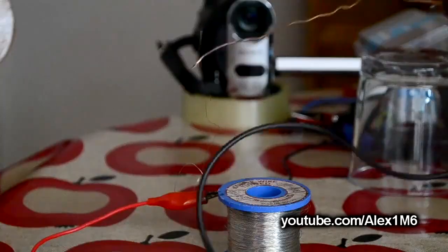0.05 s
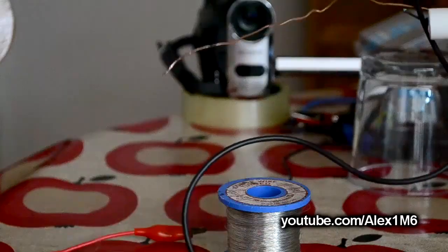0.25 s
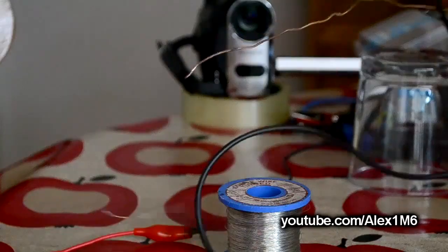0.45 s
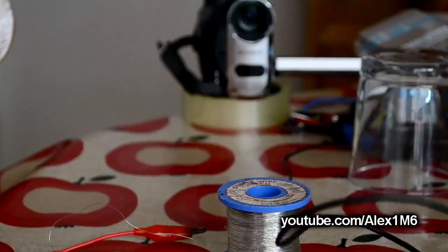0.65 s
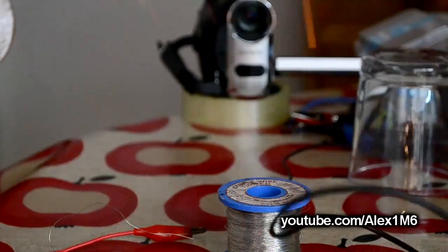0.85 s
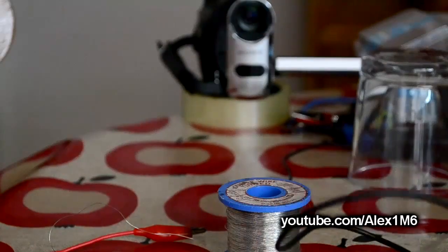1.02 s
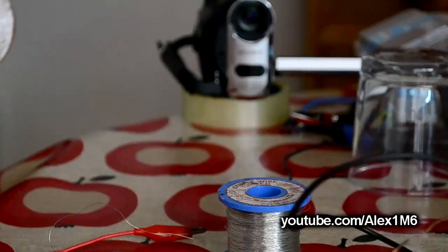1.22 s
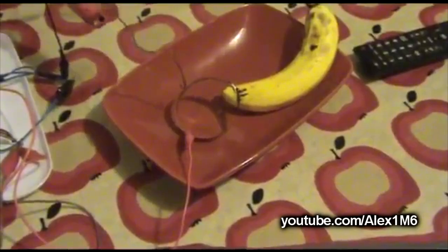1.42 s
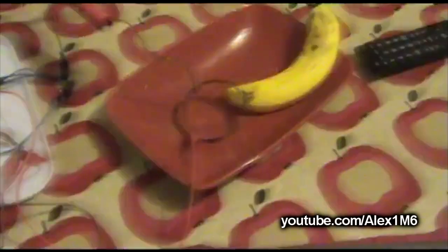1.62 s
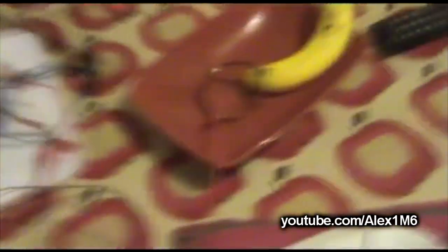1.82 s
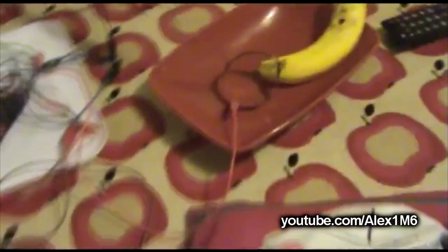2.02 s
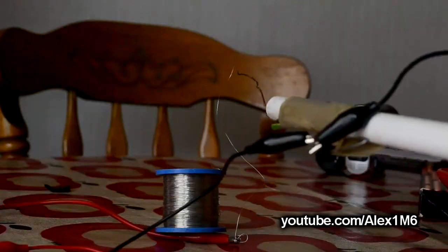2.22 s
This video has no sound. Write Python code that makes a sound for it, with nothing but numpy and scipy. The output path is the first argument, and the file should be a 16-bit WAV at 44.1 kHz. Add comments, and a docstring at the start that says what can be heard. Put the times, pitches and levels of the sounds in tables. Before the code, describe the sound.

Three loud, sharp electrical bangs crack at about 0.2, 0.9 and 1.7 seconds as thin wires burst on a table. Each overloads the microphone, then dies away within half a second with small-room echo and a slight ring of glass and metal. The third is heavier and wider, with a deep table thud, followed by faint microphone handling rumble around 2 seconds. Quiet hiss lies between the bangs.

```python
"""In a small room, a capacitor bank is shorted through thin wire on a table three times.
Each wire bursts with a push of air and a sharp crack. The table thuds, glass and metal on it ring,
and the room rings on. The bangs overload a camera's sound, then its gain control holds the ringing
down until it sinks towards the hiss. Two bangs are in mono; the third is in stereo, with the rumble
of a jolted camera. Hard cuts join the three bangs and a last moment of hiss."""
import sys
import numpy as np
from scipy import signal
from scipy.fft import irfft, next_fast_len
from scipy.io import wavfile

SR = 44100
rng = np.random.default_rng(int(sys.argv[2]) if len(sys.argv) > 2 else 0)


def inscribe(sig):
    """Save sig as 16-bit PCM at rate SR to the path in sys.argv[1].

    A 1-D sig is mono; a 2-D sig holds one channel per row.
    Samples are clipped to [-1, 1] before scaling.
    """
    pcm = np.round(np.clip(np.atleast_2d(sig).T, -1, 1) * 32767)
    wavfile.write(sys.argv[1], SR, pcm.astype(np.int16))


N = 103635

# A fade time (T60) is the time a sound takes to drop by 60 dB.
# The times, in seconds, of the cuts between the four parts.
CUT_TIMES = [.703, 1.403, 2.27]
# The tone of each camera's hiss. Each row: frequency in Hz, relative level in dB.
MONO_HISS_TONE = [(30, -18), (90, -9), (160, -2), (250, 0), (330, -3), (480, 0), (900, -2), (1500, -7),
                  (2800, -12), (3080, -8), (3300, -14), (4500, -17), (6700, -17), (7500, -23), (10000, -27)]
STEREO_HISS_TONE = [(30, -6), (160, -1), (260, 0), (350, -5), (398, 5), (450, -8), (580, -1), (680, -9),
                    (780, -1), (950, -9), (1400, -3), (1900, -14), (2800, -21), (5000, -22), (6500, -18),
                    (8000, -23), (10000, -21)]
# The rumble of the jolted camera. Each row: time in seconds, level in dB.
JOLT_LEVELS = [(1.7, -80), (1.85, -47), (1.96, -37), (2.05, -38), (2.12, -49), (2.19, -43), (2.26, -43)]
# The tone of that rumble. Each row: frequency in Hz, relative level in dB.
JOLT_TONE = [(30, -6), (80, -7), (115, -5), (140, 7), (175, -4), (230, -5), (320, 0), (430, -8), (600, -6),
             (1000, -13), (2000, -18), (5000, -22), (10000, -35)]
# How the room dies away around each camera. Each row: frequency in Hz, base fade time in seconds.
MONO_ROOM_FADES = [(60, .28), (200, .4), (500, .44), (1000, .48), (2200, .55), (3300, .51), (5000, .51),
                   (10000, .45)]
STEREO_ROOM_FADES = [(60, .38), (150, .53), (500, .51), (1000, .47), (2300, .465), (5000, .47),
                     (10000, .41)]
# The tone of the room's ring and of the crack, one list per bang.
# Each row: frequency in Hz, relative level in dB.
RING_TONES = [
    [(24, -67), (40, -37), (117, -22), (144, -19.5), (224, -23), (252, -14), (311, -14), (349, -6),
     (496, -6), (544, -1), (584, -6), (720, -6), (772, -4), (1170, -4.5), (1290, -3.5), (1750, -6.5),
     (1920, -3), (2310, -4.5), (2980, -4), (5100, -5.5), (6000, -4), (7940, -8), (8710, -3), (9570, -2),
     (10500, -11), (13600, -41), (22000, -120)],
    [(24, -55.5), (40, -38), (80, -29.5), (151, -22.5), (241, -22), (277, -17), (341, -17), (421, -8),
     (462, -14), (597, -10), (656, -12), (888, -6), (952, -6), (1170, -3), (1450, -6.5), (1550, -5),
     (2850, 0), (3270, -4), (3770, -8), (4040, -4), (6140, -5), (6900, -6), (7940, -12), (9570, -9),
     (10500, -18), (13600, -48), (22000, -120)],
    [(24, -61), (40, -31), (103, -34.5), (160, -19), (188, -13), (237, -18), (279, -11), (320, -17.5),
     (532, -9), (583, -12), (625, -9), (735, -9), (844, -5.5), (1060, -3), (1140, -1), (1250, 0),
     (1370, -1.5), (1470, -2), (1730, -3.5), (2390, -2), (3150, -6.5), (3620, -2), (5740, -4), (8310, -9),
     (10000, -14), (13000, -44), (22000, -120)],
]
CRACK_TONES = [
    [(40, -18), (170, -12), (260, -10), (400, -12), (550, 3), (700, -1), (1100, -4), (1550, 0), (1900, -8),
     (3300, -7), (5000, -14.5), (7900, -20), (10000, -14)],
    [(40, -19), (170, -9), (340, -6), (480, 0), (650, -1), (870, -2), (1400, 1), (2300, 1), (3000, -6),
     (5700, -10), (7500, -17), (10000, -14)],
    [(40, -3), (100, 4), (220, -1), (430, -4), (630, 5), (850, -6), (1020, 1), (1300, 2), (2200, -4),
     (4400, -5), (5700, -2), (10000, -1)],
]
# The notes of the glass and metal, one list per bang.
# Each row: pitch in Hz, relative level in dB, fade time in seconds (capped at OBJECT_MAX_T60_S).
OBJECT_NOTES = [
    [(1249, -13, 0.51), (1922, -12, 0.53), (3090, -10, 0.48), (4479, -12, 0.49), (4737, -15, 0.58),
     (5879, -14, 0.51), (6352, -16, 0.56), (7381, -14, 0.43), (8640, -7, 0.29), (8710, -11, 0.39),
     (8899, -12, 0.41), (9222, -17, 0.62), (9528, 0, 0.19), (9830, -15, 0.46)],
    [(1879, -3, 0.51), (2439, -8, 0.75), (2950, 0, 0.39), (3020, -10, 0.65), (4059, -13, 0.89),
     (4850, -12, 0.66), (5093, -9, 0.62), (5410, -8, 0.51), (5905, -2, 0.28), (6740, -8, 0.48),
     (8651, -12, 0.52), (9281, -2, 0.25), (9421, -11, 0.45), (9641, -13, 0.53)],
    [(1400, -6, 1.2), (2008, -8, 1.1), (2428, -1, 0.62), (3478, -21, 5.0), (3650, -5, 0.79),
     (3892, 0, 0.41), (4215, -11, 2.7), (5259, -14, 2.3), (5927, -9, 1.1), (6546, -18, 4.0),
     (6740, -11, 1.1), (7795, -10, 0.77)],
]
OBJECT_LEVELS_DB, OBJECT_MAX_T60_S = [-3, -3.5, 7.5], .43
# The table's thud at each bang. Each row: level in dB, pitch in Hz, spread in Hz, fade time in seconds.
TABLE_THUDS = [(-35, 130, 70, .22), (-12, 400, 260, .24), (18, 100, 34, .135)]
# Nearby surfaces throw the blast back. Each row: delay in seconds, relative level in dB.
NEAR_ECHOES = [(.0034, -10), (.0165, -8)]
# The bursting wires. Each row: start in seconds, blast level in dB, length of the push in seconds,
# crack level in dB, room level in dB, a number that multiplies the room's fade times.
WIRE_BURSTS = [(.2019, 9.5, .0006, 12.5, 11.2, .92), (.9356, 10, .0006, 15, 17.2, .88),
               (1.6661, 30, .002, 22, 25.2, 1.0)]
# How alike left and right are in stereo.
# Each row: frequency in Hz, likeness (1 is the same, 0 is unrelated, below 0 is partly opposite).
HISS_AND_JOLT_LIKENESS = [(60, .6), (200, .1), (1000, .1), (9000, 0.27)]
ROOM_LIKENESS = [(60, .8), (150, .2), (300, .4), (1000, .55), (3000, 0.45), (9000, .6)]
TABLE_LIKENESS = [(60, .8), (140, 0)]
WIRE_CRACK_LIKENESS = [(60, .7), (140, -.2), (400, .1), (1500, .3), (9000, 0.17)]
# The gain control for each bang. Each row: limit in dB, softness of the bend in dB,
# level in dB where gentle turning down begins, share of the excess it removes (0 to 1).
GAIN_SETTINGS = [(-6.5, 2, -20, .31), (-6.8, 2, -21, .43), (-9.6, 1.5, -20, .05)]


def amp(db):
    """Turns decibels into a number to multiply by."""
    return 10 ** (np.asarray(db) / 20)


def fade(t, t60):
    """A smooth fade that drops 60 dB in t60 seconds."""
    return np.exp(-np.log(1000) * t / t60)


def look_up(points, hz):
    """Finds values between a table's rows, giving each octave about equal space."""
    row_hz, values = np.transpose(points)
    return np.interp(np.log(hz + 1), np.log(row_hz + 1), values)


def noise(tone, likeness=None):
    """Left and right noise with a given tone; both sides match unless a likeness is given."""
    size = next_fast_len(N)
    hz = np.fft.rfftfreq(size, 1 / SR)
    a, b, c, d = rng.standard_normal((4, len(hz)))
    same = 1 if likeness is None else np.clip(look_up(likeness, hz), -1, 1)
    left = a + 1j * b
    right = same * left + np.sqrt(1 - same ** 2) * (c + 1j * d)
    spectrum = np.array([left, right]) * amp(look_up(tone, hz)) * (hz < 12000)
    sound = irfft(spectrum, size)[:, :N]
    return sound / sound.std()


def parts():
    """The samples that each of the four parts fills."""
    edges = [0] + [round(seconds * SR) for seconds in CUT_TIMES] + [N]
    return [slice(start, end) for start, end in zip(edges, edges[1:])]


def smooth(x, seconds):
    """Follows a signal with a lag, evening out quick changes."""
    keep = np.exp(-1 / (seconds * SR))
    return signal.lfilter([1 - keep], [1, -keep], x)


def low_pass(x, hz, taps):
    """Removes the treble above hz; more taps make the edge steeper."""
    weights = signal.firwin(taps, hz, window=("kaiser", 9), fs=SR)
    return signal.oaconvolve(x, weights[None], "same", axes=1)


def hiss(tone, level_db, likeness=None):
    """The steady hiss behind everything."""
    return amp(level_db) * noise(tone, likeness)


def camera_jolt(t):
    """The hand-held camera rumbles as it jolts after the third bang."""
    level_db = np.interp(t, *np.transpose(JOLT_LEVELS))
    return amp(level_db) * noise(JOLT_TONE, HISS_AND_JOLT_LIKENESS)


def room_ring(t, tone, room_fades, stretch, likeness, rise_s=.006):
    """Echoes quickly fill the room, then each frequency dies away at its own speed."""
    hz, times, spectrum = signal.stft(noise(tone, likeness), SR, nperseg=512, noverlap=384)
    t60 = stretch * look_up(room_fades, hz)[:, None]
    _, ring = signal.istft(spectrum * fade(times, t60), SR, nperseg=512, noverlap=384)
    return ring[:, :N] * (1 - np.exp(-t / rise_s))


def glass_and_metal(t, notes):
    """Things on the table, struck by the blast, ring with pure fading notes."""
    ringing = np.zeros(N)
    for hz, db, t60 in notes:
        wave = np.sin(2 * np.pi * (hz * t + rng.random()))
        ringing += amp(db) * fade(t, min(t60, OBJECT_MAX_T60_S)) * wave
    return ringing


def table_thud(t, level_db, pitch_hz, spread_hz, t60, likeness):
    """The table top shakes briefly in a broad band around one low pitch."""
    hz = np.geomspace(20, 2000, 60)
    tone_db = -20 * np.log10(1 + ((hz - pitch_hz) / spread_hz) ** 2)
    return amp(level_db) * noise(np.transpose([hz, tone_db]), likeness) * fade(t, t60)


def wire_crack(t, tone, likeness):
    """Reflections from close by blur into one short crack of noise."""
    return noise(tone, likeness) * fade(t, t60=.135)


def blast_wave(t, push_s):
    """The bursting wire gives the air a sudden push, followed by a longer, weaker pull."""
    age = np.maximum(t, 0) / push_s
    return (t >= 0) * (1 - age) * np.exp(-age)


def wire_bang(t, index, room_fades, crack_likeness=None, ring_likeness=None, thud_likeness=None):
    """One wire bursts: a blast with echoes and a crack, then the table and room ring on."""
    start_s, blast_db, push_s, crack_db, room_db, stretch = WIRE_BURSTS[index]
    echoes = sum(amp(db) * blast_wave(t - delay, push_s) for delay, db in NEAR_ECHOES)
    blast = amp(blast_db) * (blast_wave(t, push_s) + echoes)
    crack = amp(crack_db) * wire_crack(t, CRACK_TONES[index], crack_likeness)
    ring = amp(room_db) * room_ring(t, RING_TONES[index], room_fades, stretch, ring_likeness)
    thud = table_thud(t, *TABLE_THUDS[index], thud_likeness)
    objects = amp(OBJECT_LEVELS_DB[index]) * glass_and_metal(t, OBJECT_NOTES[index])
    sound = crack + ring + thud + objects - blast
    return np.pad(sound, ((0, 0), (round(start_s * SR), 0)))[:, :N]


def scene():
    """Three parts with a bang each and one of hiss alone, joined end to end."""
    t = np.arange(N) / SR
    mono_hiss = hiss(MONO_HISS_TONE, level_db=-58.7)
    first = mono_hiss + wire_bang(t, 0, MONO_ROOM_FADES)
    second = mono_hiss + wire_bang(t, 1, MONO_ROOM_FADES)
    third = wire_bang(t, 2, STEREO_ROOM_FADES, WIRE_CRACK_LIKENESS, ROOM_LIKENESS, TABLE_LIKENESS)
    third += hiss(STEREO_HISS_TONE, level_db=-48.5, likeness=HISS_AND_JOLT_LIKENESS)
    third += camera_jolt(t)
    sounds = [first, second, third, mono_hiss]
    return np.hstack([sound[:, part] for sound, part in zip(sounds, parts())])


def gain_control(x, settings, firm_share, sense_s, react_s, ceiling_db):
    """Turns loud sound down, but too late for the crack, whose peaks are chopped flat."""
    limit_db, bend_db, gentle_db, gentle_share = settings
    level_db = 10 * np.log10(smooth((x ** 2).mean(0), sense_s) + 1e-12)
    # The level is lowered gently first, then firmly where it still passes the limit.
    gentle_cut_db = gentle_share * bend_db * np.logaddexp(0, (level_db - gentle_db) / bend_db)
    excess_db = level_db - gentle_cut_db - limit_db
    firm_cut_db = firm_share * bend_db * np.logaddexp(0, excess_db / bend_db)
    gain = amp(-smooth(gentle_cut_db + firm_cut_db, react_s))
    return np.clip(x * gain, -amp(ceiling_db), amp(ceiling_db))


def mono_camera(x, settings):
    """The mono camera holds the level down and rolls off the highest treble."""
    held = gain_control(x, settings, firm_share=.96, sense_s=.0031, react_s=.004, ceiling_db=-.55)
    return low_pass(held, hz=10900, taps=91)


def stereo_camera(x, settings):
    """The stereo camera reacts a little faster and cuts the treble more steeply."""
    held = gain_control(x, settings, firm_share=.93, sense_s=.0026, react_s=.0025, ceiling_db=-.75)
    return low_pass(held, hz=10350, taps=511)


def record(dry):
    """Each part goes through its camera; peaks past full scale are then flattened and smoothed."""
    first, second, third, last = (dry[:, part] for part in parts())
    joined = np.hstack([mono_camera(first, GAIN_SETTINGS[0]),
                        mono_camera(second, GAIN_SETTINGS[1]),
                        stereo_camera(third, GAIN_SETTINGS[2]),
                        mono_camera(last, GAIN_SETTINGS[0])])
    return low_pass(np.clip(joined, -1, 1), hz=16000, taps=511)


dry = scene()
out = record(dry)
inscribe(out)
```